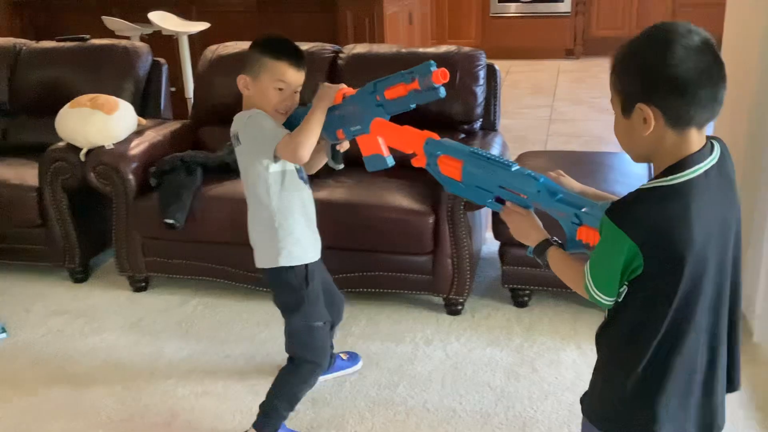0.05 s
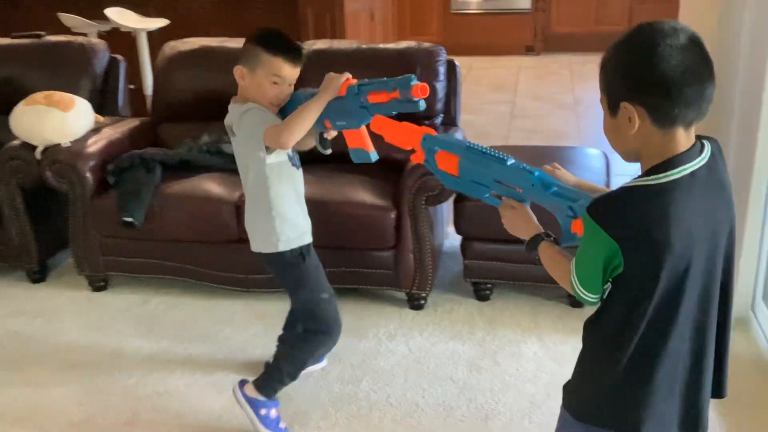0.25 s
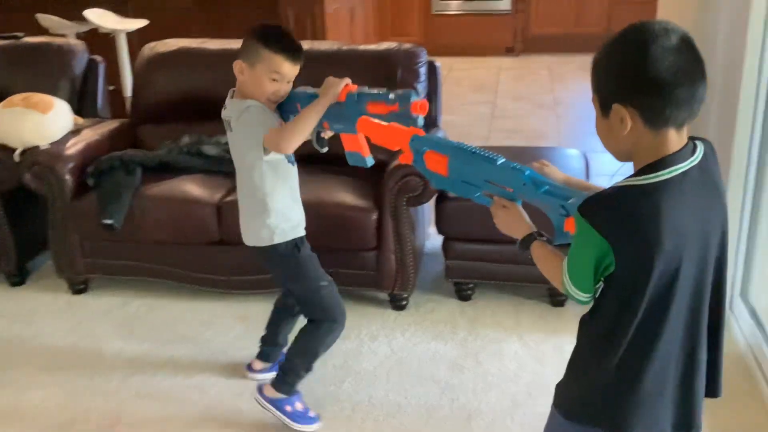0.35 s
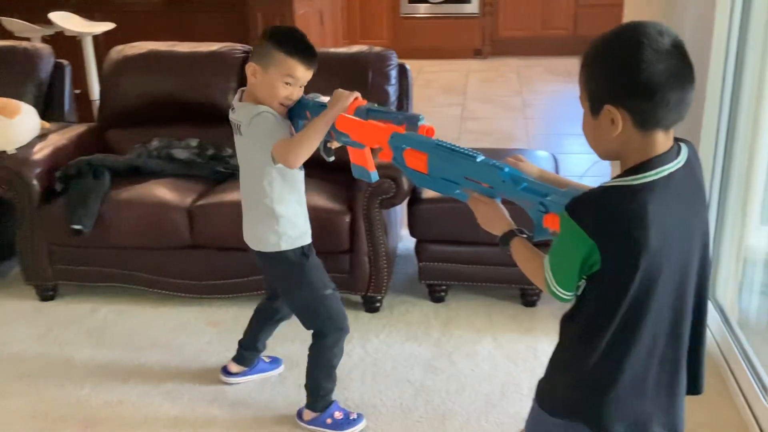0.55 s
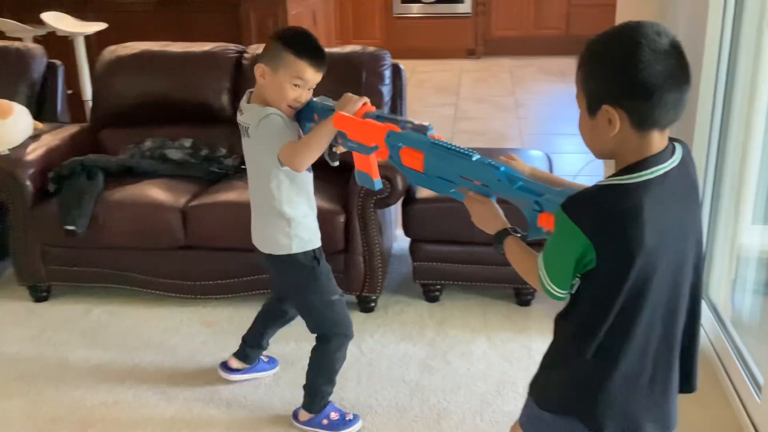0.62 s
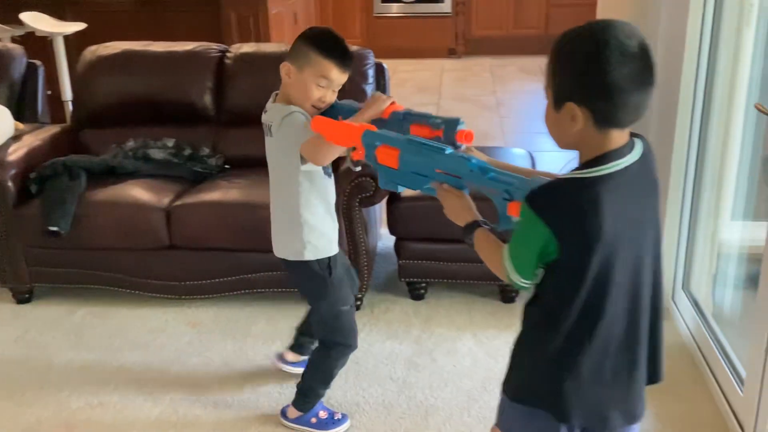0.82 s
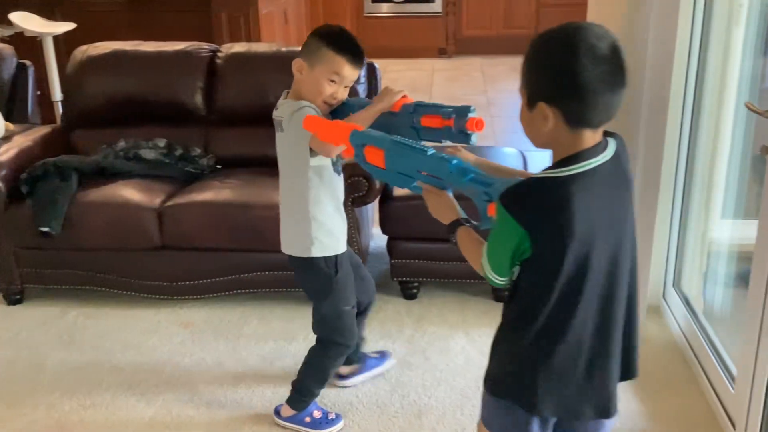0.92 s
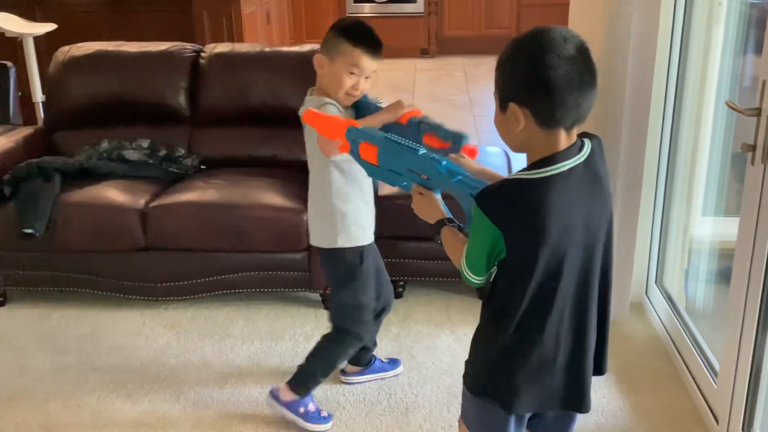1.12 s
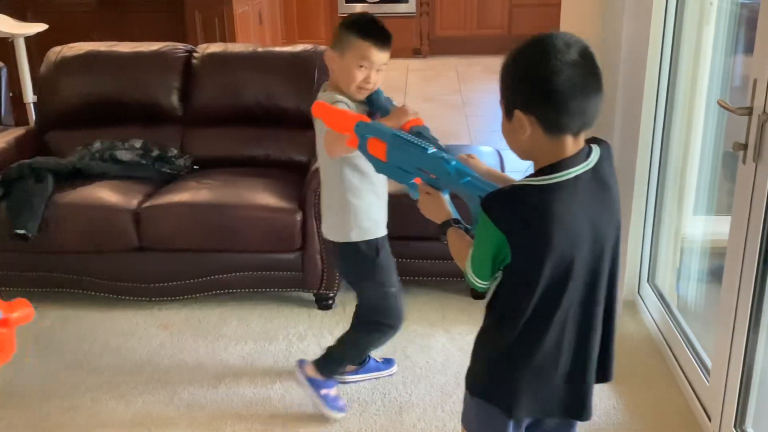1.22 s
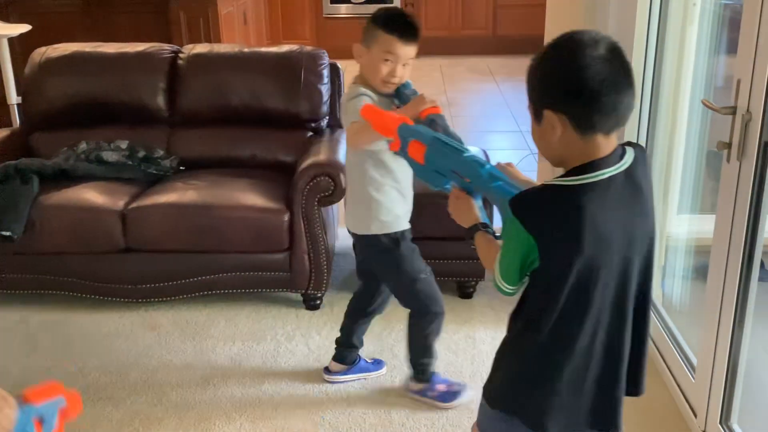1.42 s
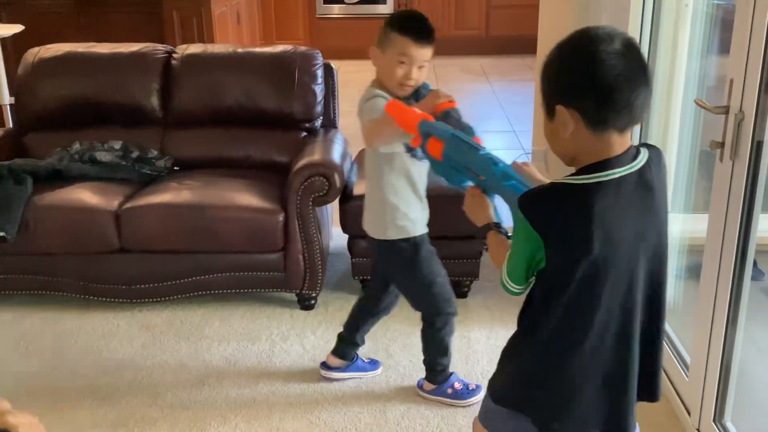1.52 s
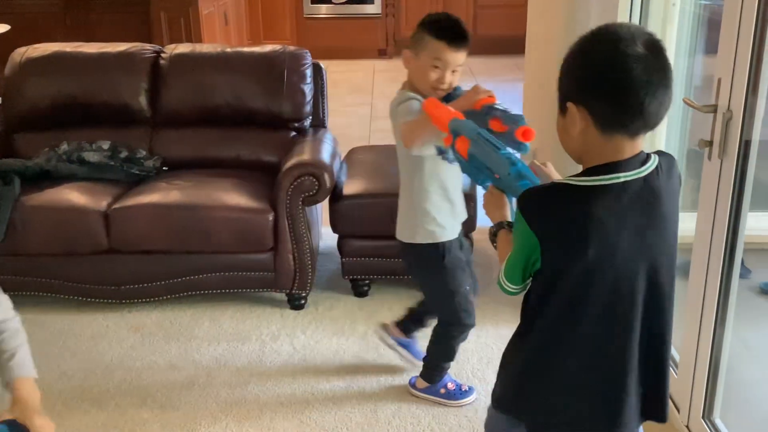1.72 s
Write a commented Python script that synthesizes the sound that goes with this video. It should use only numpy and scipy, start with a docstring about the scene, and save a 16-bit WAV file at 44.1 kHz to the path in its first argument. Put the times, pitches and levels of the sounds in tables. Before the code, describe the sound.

Two toy foam-dart blasters fire nearby in a living room. After light handling clicks, the first shoots at about 0.2 seconds, a sharp burst of plastic clacks with a soft air thud and a faintly ringing spring. The second fires at 0.8 seconds, slightly hollower. Smaller clicks follow, a priming slide hits its stop at 1.3 seconds, and a faint rattle at 1.7 fades into quiet room air.

```python
"""A living room, where two toy foam-dart blasters fire one shot each.
A shot is a quick run of hard plastic clacks, loose parts chattering against the shell, with a soft
thud of air and a spring left ringing. Around the shots, slides and catches click and small parts ping.
Everything dies away in the room, over a quiet bed of air."""
import sys
import numpy as np
from scipy import signal
from scipy.fft import rfft, irfft, next_fast_len
from scipy.io import wavfile
from scipy.ndimage import uniform_filter1d

SR = 44100
rng = np.random.default_rng(int(sys.argv[2]) if len(sys.argv) > 2 else 0)


def generate_wav(signal):
    """Clip the signal to [-1, 1] and save it as 16-bit WAV at the path in sys.argv[1]."""
    frames = np.transpose(np.atleast_2d(signal))
    scaled = np.clip(frames, -1, 1) * 32767
    pcm = np.round(scaled).astype(np.int16)
    wavfile.write(sys.argv[1], SR, pcm)


N = 77175
T = np.arange(N) / SR

# EQ of the room tone, the opening tail and the reverb: freq_hz, gain_db
ROOM_TONE_EQ = [(25, -20), (45, -4), (70, 1.5), (130, -1), (250, -0.5), (600, 2), (2000, 0), (5000, -8.5),
                (10000, -17.5), (16000, -28)]
OPENING_TAIL_EQ = [(100, -10), (300, -17), (550, 2), (2000, 1.5), (5000, -3.5), (8000, -10), (15000, -21.5)]
REVERB_EQ = [(100, 7.5), (330, 2), (520, -0.5), (1000, -2.5), (2000, -4), (4500, 0), (9000, 0), (15000, 2)]
# Reverb time across the spectrum: freq_hz, t60_s
REVERB_DECAY = [(150, 0.94), (530, 0.73), (1400, 1), (3700, 0.86), (9700, 0.61), (15000, 0.37)]
# Low resonances of the room: pitch_hz, level_db, t60_s
ROOM_MODES = [(232.7, -2, 0.48), (74, -1, .25)]
# Thuds of air at each shot, and a faint late boom: peak_s, pitch_hz, level_db, half_length_s
AIR_THUDS = [(.232, 303, -39, 0.0033), (0.238, 83, -46, 0.016), (.25, 168, -49, .012),
             (0.3, 317, -38.5, 0.0071), (0.79, 256, -26, 0.0048), (0.8, 270, -27, 0.004),
             (.797, 135, -38, 0.012), (.784, 70, -47, 0.015), (1.585, 135, -56.5, 0.048)]
# Small parts that ping when hit: start_s, pitch_hz, level_db, t60_s
PART_PINGS = [(.096, 5270, -28, 0.031), (0.2113, 2220, -11, 0.034), (0.2122, 2730, -11.5, .025),
              (0.2153, 984, -9.5, 0.038), (.232, 861, -13, 0.036), (.2325, 1477, -8, 0.027),
              (0.2894, 5270, -10, 0.021), (.42, 5000, -30, 0.033), (.726, 556, -23, 0.063),
              (0.725, 1505, -24.5, 0.06), (0.7714, 4640, -4, 0.021), (.8043, 3660, -7.5, 0.02),
              (0.8064, 2926, -13.5, 0.054), (0.8045, 1930, -21, 0.05), (.821, 1570, -21, .06),
              (1.148, 1785, -28, 0.051), (1.147, 1626, -32.5, 0.058), (1.679, 1930, -37.5, 0.064)]
# Modes of the priming slide, the second blaster's hollow shell, and each blaster's spring and tube:
# pitch_hz, level_db, t60_s
SLIDE_MODES = [(441, -11, 0.026), (543, -4, 0.055), (620, -4, 0.067), (724, -12, 0.044), (1074, -5, 0.04),
               (1192, -1.5, 0.056), (1448, -8.5, 0.053), (2692, -6, 0.032), (3060, -13, 0.085),
               (5420, -12, 0.064), (6160, -16, 0.06), (7160, -11, 0.05)]
SHELL_MODES = [(479, -4.5, 0.105), (766, -0.5, 0.1), (1010, -4, .07), (1193, -2, .09), (1417, 0, .07)]
FIRST_SPRING_MODES = [(882, -1, 0.38), (936, 2.5, 0.34), (1015, 0.5, 0.52), (1126, -7, 0.74),
                      (1512, -2, 0.45), (1584, 4.5, 0.32), (1606, 1.5, 0.44), (1695, 0, 0.65),
                      (2010, -8, 0.37), (2125, -11, 0.42), (2840, -1, 0.21), (3610, 4.5, 0.27),
                      (8950, -2, 0.45)]
SECOND_SPRING_MODES = [(776, -3, 0.35), (1210, -10, 0.3), (1410, 3.5, 0.43), (2334, -2.5, 0.84),
                       (2700, 9, 0.27), (2823, -4, 0.73), (2770, 1, 0.61), (2993, 3.5, 0.46),
                       (3680, -10, 0.38), (4030, -2, 0.38), (4480, 3, 0.21), (5500, -7, 0.32),
                       (6600, -2, 0.33)]
# The slide hitting its stop, and two knocks on the shell in the second shot: start_s, level_db
SLIDE_STOPS = [(1.3426, -17.5)]
SHELL_KNOCKS = [(.782, -25), (.805, -23.5)]
# What the plastic shells radiate: freq_hz, gain_db
PLASTIC_EQ = [(40, -61), (150, -37.5), (300, -20.5), (520, -1.5), (860, 0.5), (1150, 2.5), (1350, 0.5),
              (1600, 2), (2000, 0.5), (3000, 0), (4400, -6), (5800, -4.5), (6400, -10), (9000, -11),
              (12500, -19), (15800, -29)]
# Centres of a clack's bass, body, middle, bite and treble bands: freq_hz
CLACK_BANDS_HZ = (200, 600, 2000, 4600, 8000)
# Hits on plastic, in the handling and in each shot:
# start_s, level_db, attack_s, decay_constant_s, body_db, bite_db, treble_db
HANDLING_HITS = [(.0945, -33, 0.0018, 0.0086, -10, 17, 13.5), (.1485, -32.5, .001, 0.013, 6.5, 9, 4),
                 (.16, -18, .011, 0.02, -1.5, -10, -8), (.181, -23, 0.0089, 0.018, -3, 0, 0.5),
                 (.419, -27, 0.00072, 0.0058, 8, 17.5, 7), (.552, -33, 0.005, 0.0067, -12, 8, 1),
                 (.573, -30, 0.0025, 0.0084, -7, 1, 0), (.59, -22.5, 0.0059, 0.008, 7, 0.5, -3),
                 (.7005, -21, 0.0028, 0.01, -2, -4, -3), (.7225, -16, 0.0032, 0.01, 1, -3.5, -3),
                 (1.147, -20, 0.003, 0.01, -12, -10.5, -12), (1.215, -36, 0.005, 0.0055, -15, 7.5, -3),
                 (1.2275, -21.5, 0.0032, 0.011, 1.5, -1.5, -3.5),
                 (1.337, -16.5, .0015, 0.0069, 2.5, 3.5, 1.5), (1.341, -13.5, 0.0043, 0.005, 5, -6.5, 1),
                 (1.385, -30.5, 0.0046, 0.017, 8, -1, -3), (1.679, -33.5, 0.003, 0.017, 7, -6, -9),
                 (1.69, -37.5, 0.021, 0.077, 7, -1.5, 1.5)]
FIRST_SHOT_HITS = [(.2055, -1.5, 0.0063, 0.0057, -7.5, -1, 3), (.215, -7.5, 0.0021, 0.019, 3, 1, 4.5),
                   (.231, -2, 0.0011, 0.0037, 6, -5, 1), (.2352, -1.5, 0.0012, 0.0033, 0, 0, 6),
                   (.242, -16, 0.0026, 0.06, -1, 3.5, 4), (.2615, -18, .001, 0.0075, 4.5, 0, 3),
                   (.288, -14.5, 0.0025, 0.0067, 8, 6, 2)]
SECOND_SHOT_HITS = [(.7684, -6.5, 0.0013, 0.0072, -13, 6.5, 5.5), (.7775, -9.5, 0.0013, 0.0084, -8.5, 3, 3),
                    (.784, -9.5, 0.0027, 0.019, -5, 4.5, 6), (.8045, -4.5, 0.0017, 0.0047, -4, 6.5, 2.5),
                    (.821, -13, 0.0025, 0.0098, 4, -6, -4), (.839, -17, 0.0043, 0.024, -2.5, -1.5, 7.5)]


def from_db(db):
    """Decibels to gain."""
    return 10 ** (np.asarray(db) / 20)


def at_hz(curve, hz):
    """Read a curve along a log-frequency axis."""
    freq_hz, values = np.transpose(curve)
    return np.interp(np.log(np.maximum(hz, 1)), np.log(freq_hz), values)


def eq(x, curve):
    """Minimum-phase EQ from (freq_hz, gain_db) points: nothing rings ahead of a hit."""
    half = next_fast_len(len(x))
    gain = from_db(at_hz(curve, np.linspace(0, SR / 2, half + 1)))
    cepstrum = irfft(np.log(gain))
    cepstrum[1:half] *= 2
    cepstrum[half + 1:] = 0
    return irfft(rfft(x, 2 * half) * np.exp(rfft(cepstrum)))[:len(x)]


def add(out, start_s, x):
    """Drop a sound onto the track."""
    i = max(int(start_s * SR), 0)
    out[i:i + len(x)] += x[:max(len(out) - i, 0)]


def thin_out(x, cutoff_hz=317):
    """Steep low cut: the handling, the slide's ringing and the pings carry no bass."""
    return signal.sosfilt(signal.butter(4, cutoff_hz, "high", fs=SR, output="sos"), x)


def ringing(modes, strikes, attack_s=0.0014):
    """Each (start_s, level_db) strike sets a bank of decaying sine modes going."""
    out = np.zeros(N)
    for start_s, strike_db in strikes:
        for pitch_hz, mode_db, t60_s in modes:
            t = T[:int(t60_s * SR)]
            envelope = from_db(strike_db + mode_db - 60 * t / t60_s) * np.minimum(t / attack_s, 1)
            add(out, start_s, rng.choice([-1, 1]) * envelope * np.sin(2 * np.pi * pitch_hz * t))
    return out


def room_tone(level_db=-43.5):
    """The room's quiet air: a steady bed of dark noise."""
    return from_db(level_db) * eq(rng.standard_normal(N), ROOM_TONE_EQ)


def reflections(bands=14):
    """Diffuse reflections: noise fading band by band, the top end first."""
    spectrum = rfft(rng.standard_normal(N))
    freq_hz = np.linspace(1, SR / 2, N // 2 + 1)
    centres_hz = np.geomspace(100, 16000, bands)
    tail = np.zeros(N)
    for centre_hz, weights in zip(centres_hz, np.eye(bands)):
        band = irfft(spectrum * at_hz(list(zip(centres_hz, weights)), freq_hz), N)
        tail += band * from_db(-60 * T / at_hz(REVERB_DECAY, centre_hz))
    return tail


def opening_tail(level_db=-28.5):
    """The room is still ringing as the scene opens."""
    return from_db(level_db) * eq(reflections(), OPENING_TAIL_EQ)


def reverb(send, build_s=0.005):
    """The living room answers, its reflections thickening over a short build-up."""
    build_up = 1 - np.exp(-(T / build_s) ** 2)
    response = eq(reflections() * build_up, REVERB_EQ)
    response /= np.sqrt(np.sum(response ** 2))
    return signal.fftconvolve(send, response)[:N]


def room_boom(start_s=0.85, level_db=-45.5):
    """The second shot's puff of air pushes the room's low resonances."""
    return ringing(ROOM_MODES, [(start_s, level_db)])


def air_thuds():
    """Soft low pushes of air, each a few cycles under a bell-shaped swell."""
    out = np.zeros(N)
    for peak_s, pitch_hz, level_db, half_length_s in AIR_THUDS:
        t = T - peak_s
        swell = np.exp(-(t / half_length_s) ** 2)
        out += from_db(level_db) * swell * np.sin(2 * np.pi * pitch_hz * t)
    return out


def part_pings():
    """Each small part rings briefly on one pitch when hit."""
    return sum(ringing([(pitch_hz, 0, t60_s)], [(start_s, level_db)])
               for start_s, pitch_hz, level_db, t60_s in PART_PINGS)


def hollow_knocks():
    """Hollow plastic rings as the shell is knocked and the priming slide hits its stop."""
    return ringing(SHELL_MODES, SHELL_KNOCKS) + thin_out(ringing(SLIDE_MODES, SLIDE_STOPS))


def spring_ring(modes, release_s, level_db):
    """The released spring and its tube ring on after the shot."""
    return ringing(modes, [(release_s, level_db)])


def chatter(size, contacts_per_s=3500, spread_db=2, scrape_gain=0.36):
    """Dense tiny contacts over a bed of scraping, ridden to an even level."""
    contacts = (rng.random(size) < contacts_per_s / SR) * rng.choice([-1, 1], size)
    contacts = contacts * from_db(rng.normal(0, spread_db, size))
    contacts /= np.sqrt(np.mean(contacts ** 2) + 1e-20)
    texture = contacts + scrape_gain * rng.standard_normal(size)
    running_rms = np.sqrt(uniform_filter1d(texture ** 2, size=128) + 1e-9)
    return texture / running_rms


def plastic_clacks(hits, size=8192):
    """Each hit swells and dies as loose plastic parts chatter against the shell."""
    out, t = np.zeros(N), T[:size]
    for start_s, level_db, attack_s, decay_s, body_db, bite_db, treble_db in hits:
        envelope = np.minimum(t / attack_s, 1) * np.exp(-np.maximum(t - attack_s, 0) / decay_s)
        tone = list(zip(CLACK_BANDS_HZ, (0, body_db, 0, bite_db, treble_db)))
        add(out, start_s, from_db(level_db) * eq(chatter(size) * envelope, tone))
    return eq(out, PLASTIC_EQ)


def scene():
    """The mono mix: two shots, the handling around them, and the room."""
    first_shot = plastic_clacks(FIRST_SHOT_HITS)
    second_shot = plastic_clacks(SECOND_SHOT_HITS)
    handling = thin_out(plastic_clacks(HANDLING_HITS))
    thuds = air_thuds()
    springs = spring_ring(FIRST_SPRING_MODES, release_s=0.231, level_db=-30)
    springs += spring_ring(SECOND_SPRING_MODES, release_s=0.772, level_db=-33)
    knocks_and_pings = hollow_knocks() + thin_out(part_pings())
    # Reverb sends, with the springs left dry: layer, send_db
    sends = [(first_shot, -7), (second_shot, -4.5), (handling, -6.5),
             (thuds, -16.5), (knocks_and_pings, -15.5)]
    wet = reverb(sum(from_db(send_db) * layer for layer, send_db in sends))
    direct = first_shot + second_shot + handling + thuds + springs + knocks_and_pings
    return (direct + wet + room_boom() + opening_tail() + room_tone())[None]


def record(dry, ceiling=0.85, low_cut_hz=45, high_cut_hz=15800):
    """Soft-clip the highest peaks, then trim the deepest rumble and the very top."""
    rounded = dry / (1 + (dry / ceiling) ** 8) ** (1 / 8)
    low_cut = signal.butter(2, low_cut_hz, "high", fs=SR, output="sos")
    high_cut = signal.ellip(10, .2, 70, high_cut_hz, fs=SR, output="sos")
    return signal.sosfilt(high_cut, signal.sosfilt(low_cut, rounded))


dry = scene()
out = record(dry)
generate_wav(out)
```